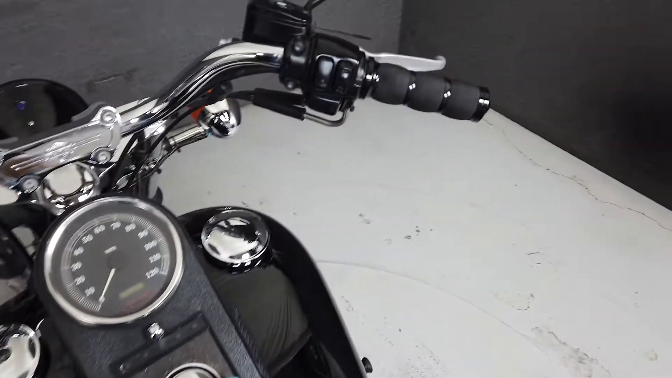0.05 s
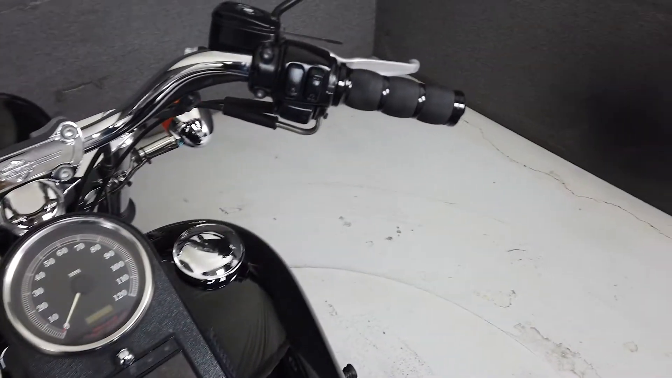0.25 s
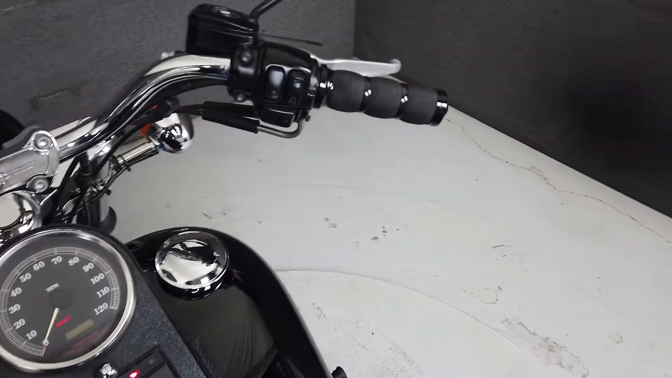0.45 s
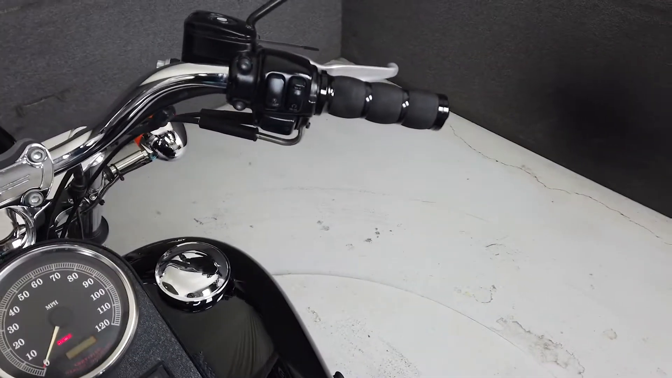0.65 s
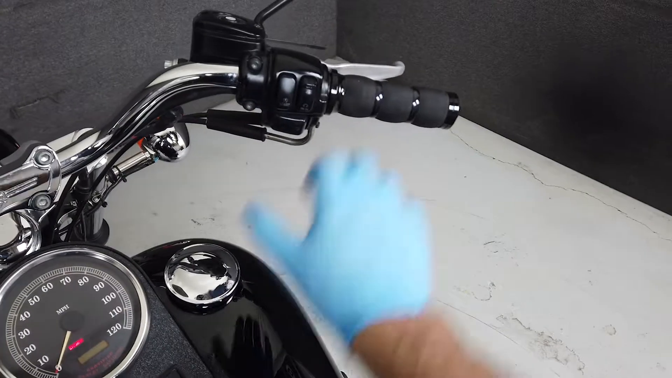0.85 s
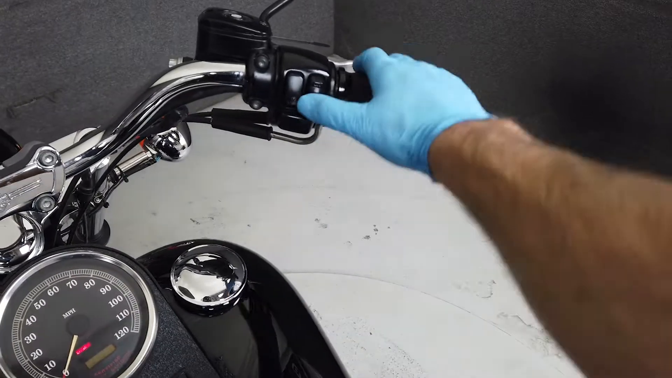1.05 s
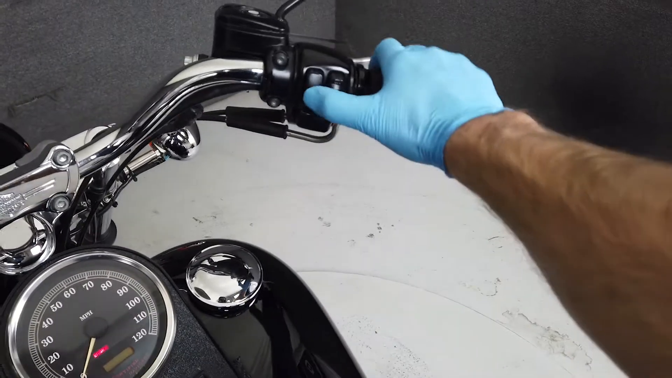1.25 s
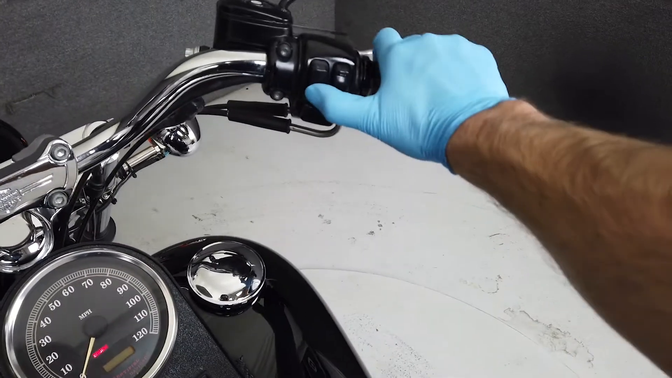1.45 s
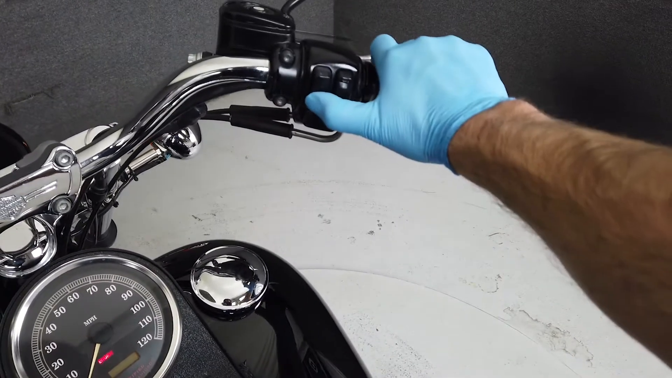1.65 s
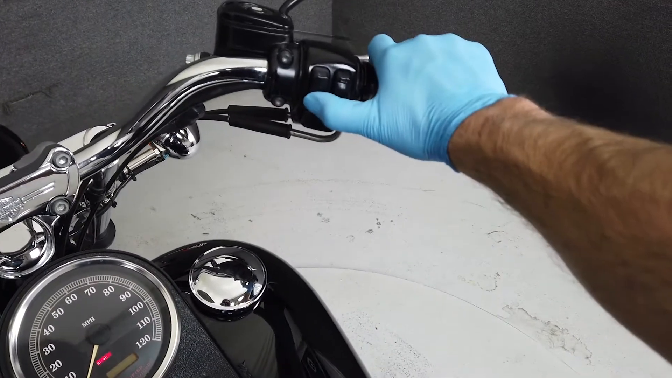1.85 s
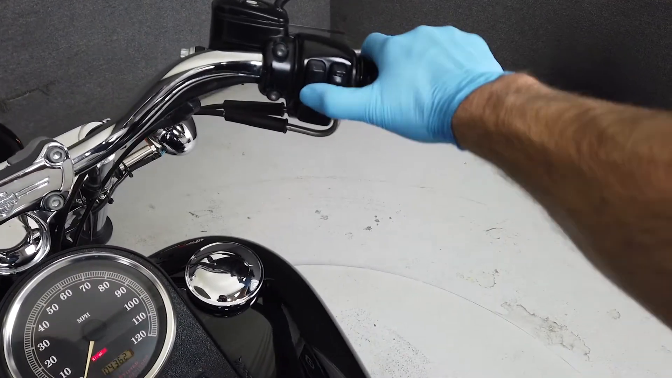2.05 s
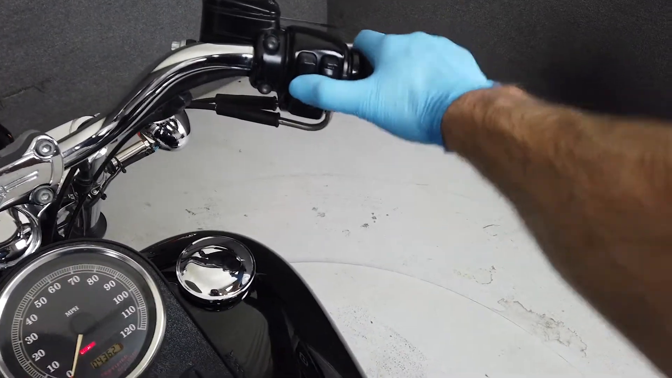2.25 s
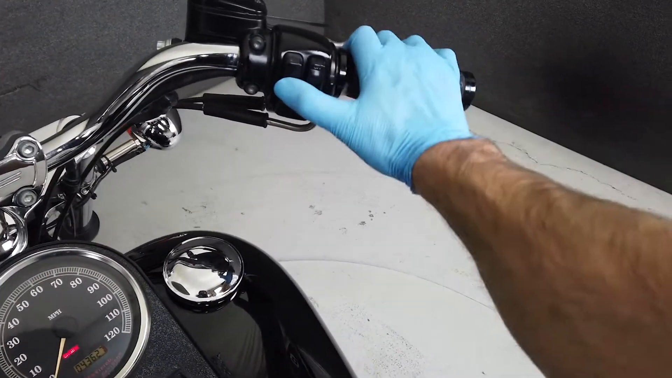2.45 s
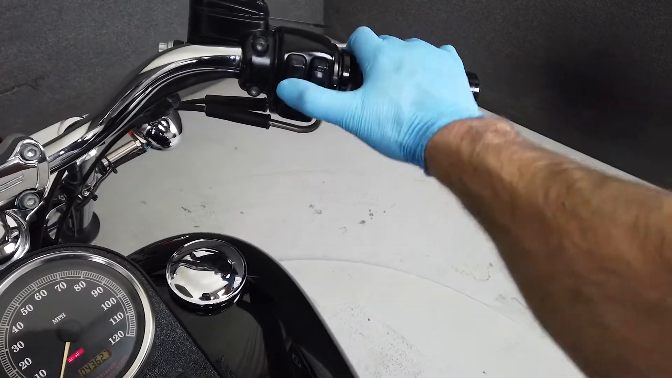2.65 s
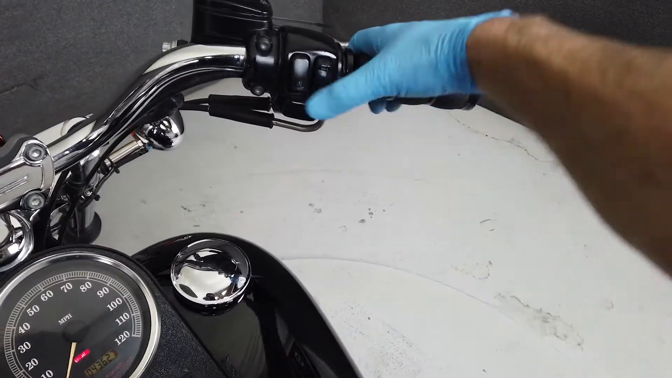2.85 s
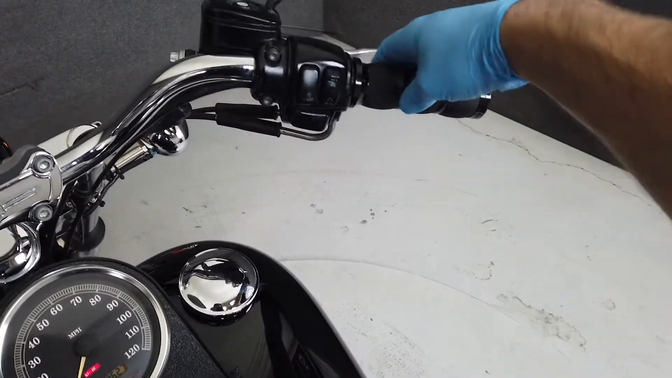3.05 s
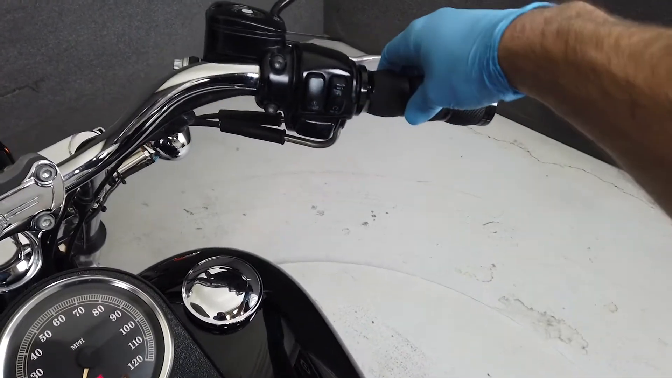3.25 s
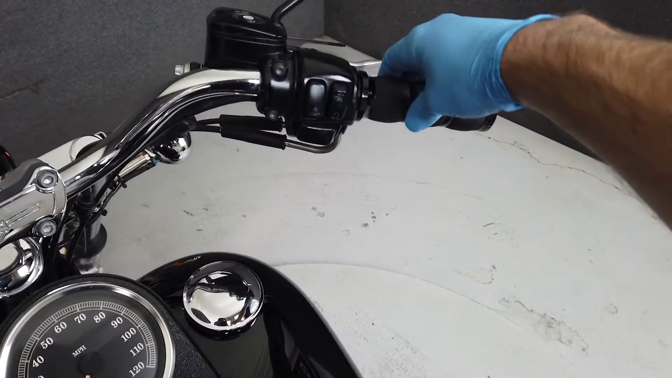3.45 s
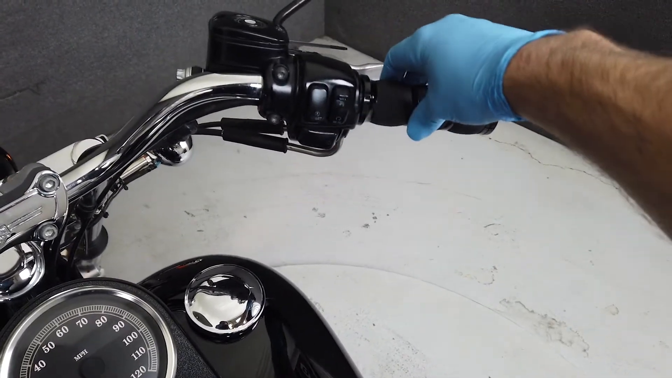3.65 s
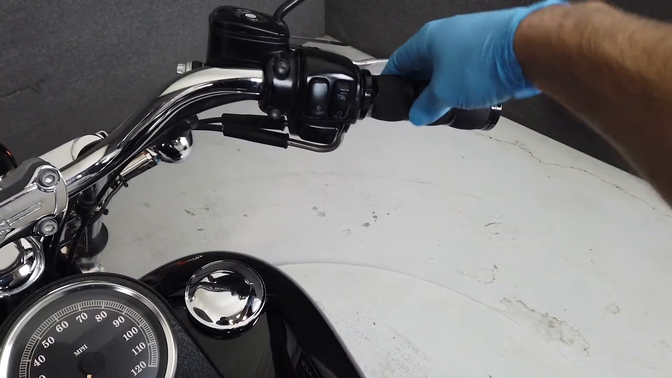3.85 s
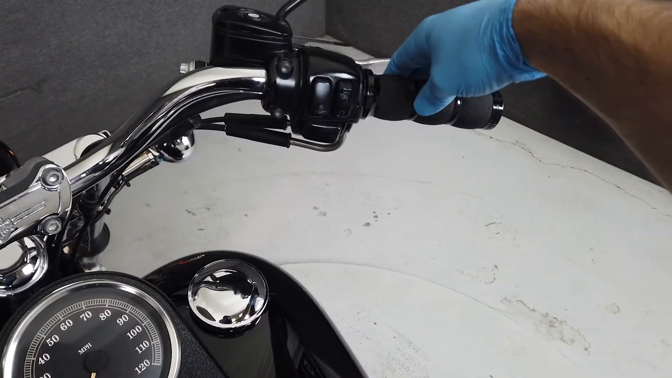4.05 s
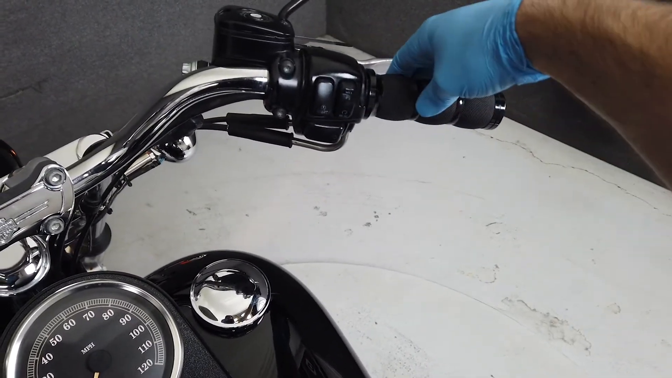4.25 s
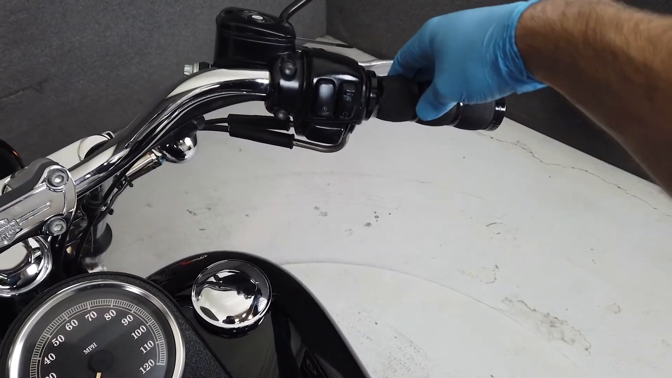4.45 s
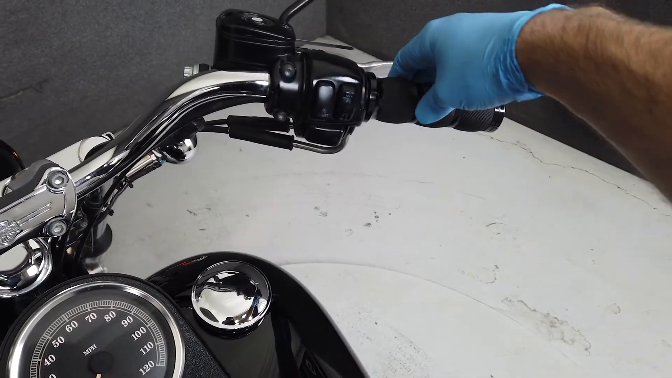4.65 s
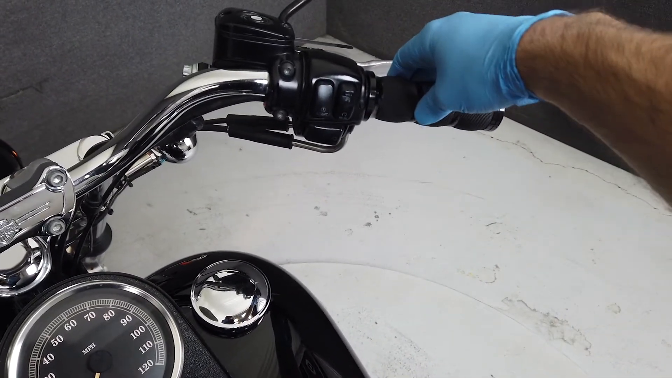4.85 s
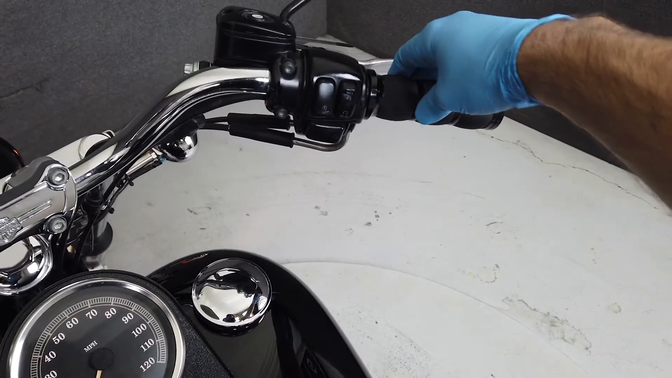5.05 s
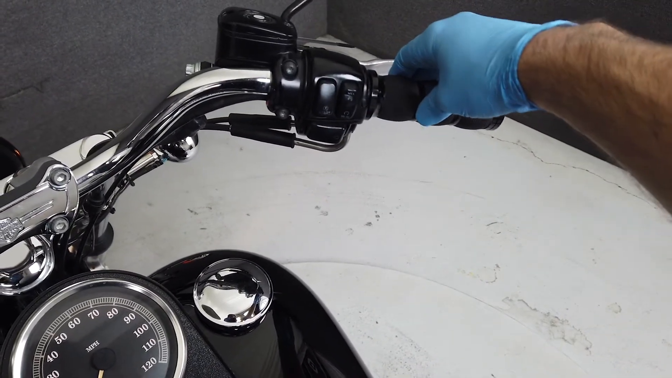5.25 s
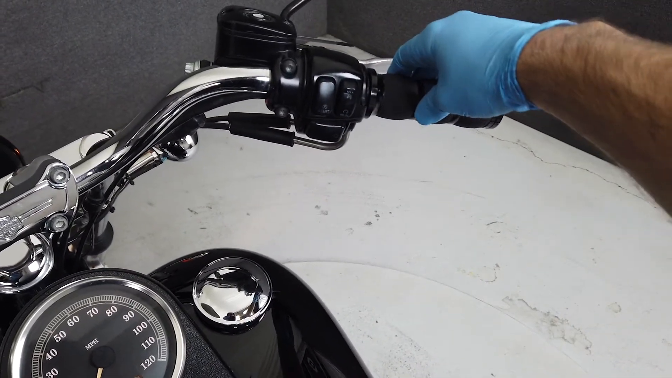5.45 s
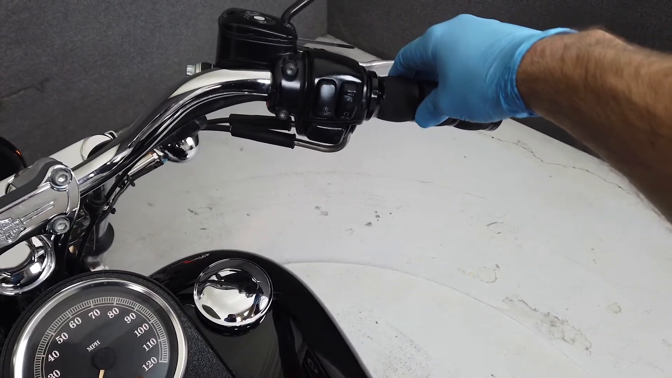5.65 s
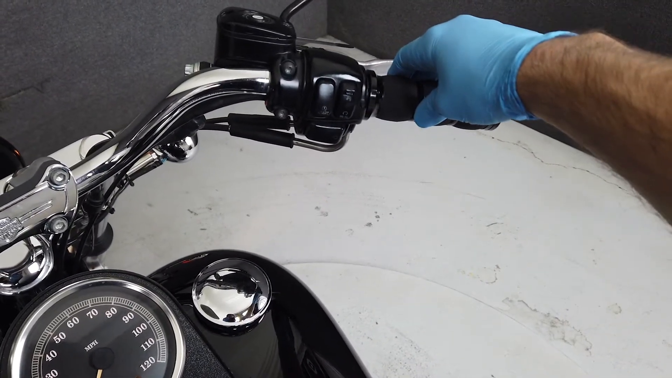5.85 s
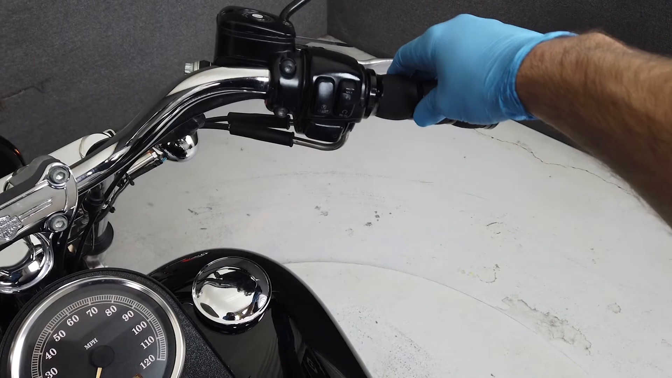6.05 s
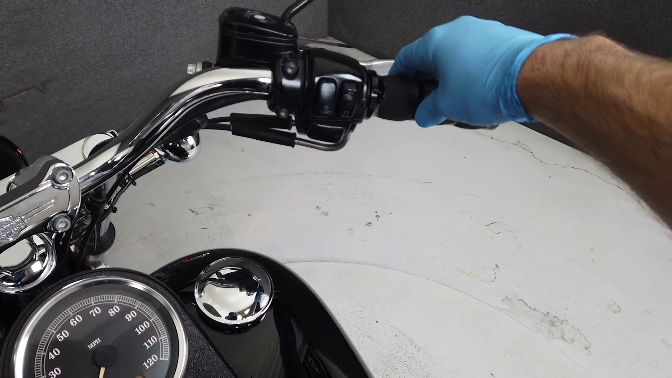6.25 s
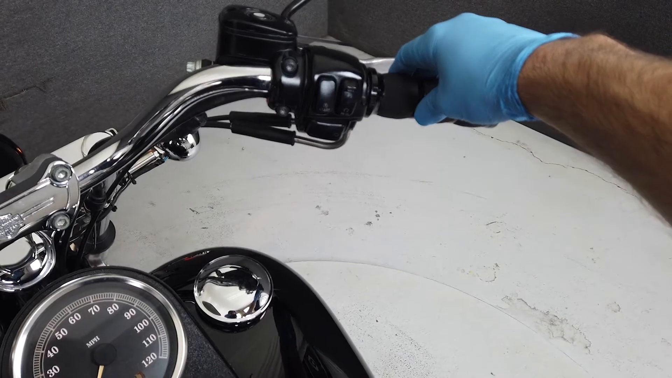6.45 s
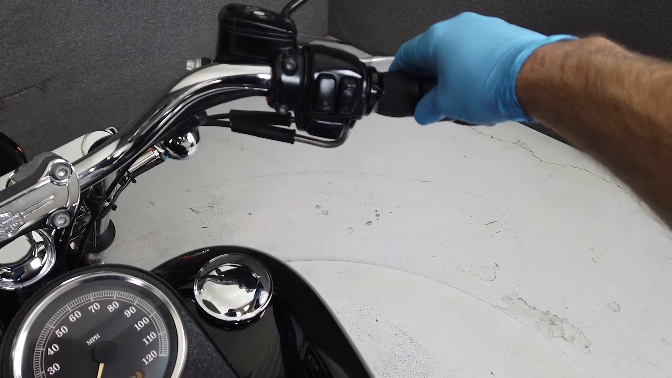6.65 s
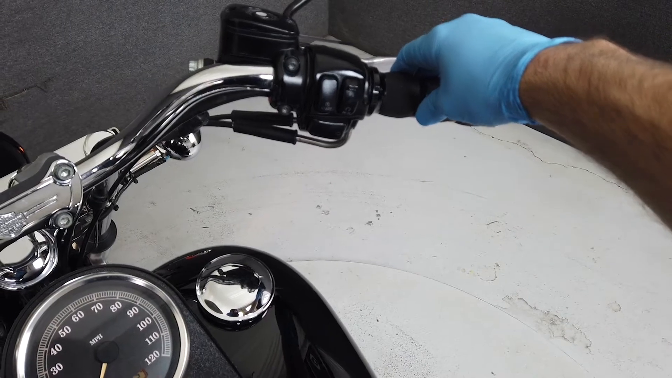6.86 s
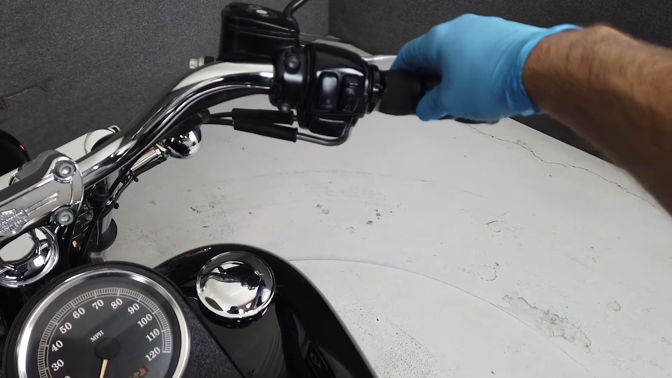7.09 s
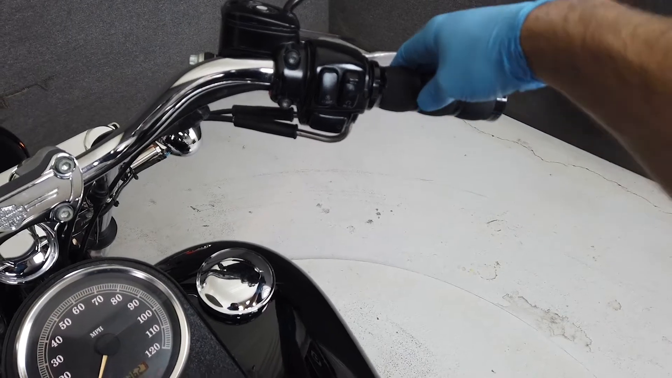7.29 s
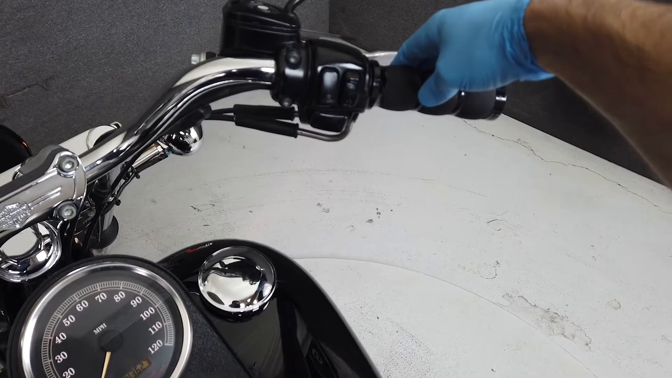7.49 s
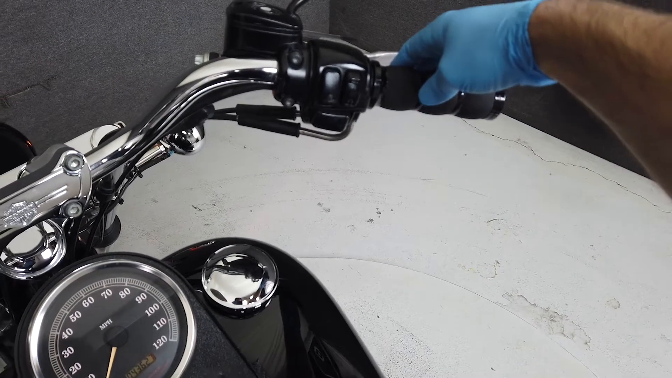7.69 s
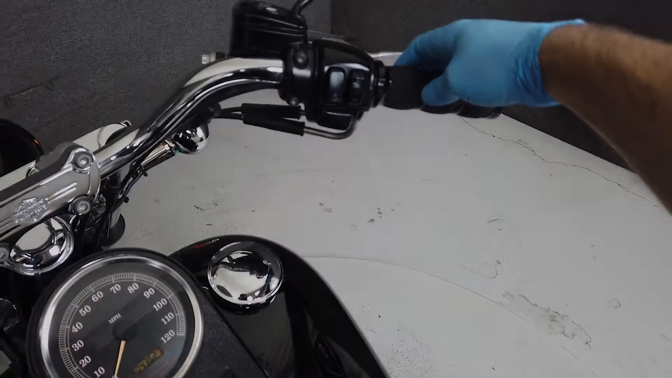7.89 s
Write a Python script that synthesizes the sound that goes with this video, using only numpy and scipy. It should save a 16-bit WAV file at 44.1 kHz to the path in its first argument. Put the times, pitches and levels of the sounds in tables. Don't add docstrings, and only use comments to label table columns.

```python
import sys
import numpy as np
from scipy import signal
from scipy.fft import rfft, irfft, next_fast_len
from scipy.io import wavfile
from scipy.ndimage import uniform_filter1d

SR = 44100
rng = np.random.default_rng(int(sys.argv[2]) if len(sys.argv) > 2 else 0)


def to_linear_factor(level_db):
    exponent = np.asarray(level_db, float) / 20
    return 10 ** exponent


def dump_mix(stems):
    frames = np.atleast_2d(stems).T
    limited = np.clip(frames, -1, 1)
    pcm = np.round(limited * 32767).astype(np.int16)
    wavfile.write(sys.argv[1], SR, pcm)


N = 349488


def in_time(rows, edge=None):
    s, *columns = np.transpose(rows)
    return [np.interp(np.arange(N) / SR, s, column, left=edge, right=edge) for column in columns]


def at_hz(points, hz):
    point_hz, value = np.array(points)[:, 0], np.array(points)[:, 1]
    return np.interp(np.log(hz + 1), np.log(point_hz), value)


def bump(s, width):
    return np.exp(-((np.arange(N) / SR - s) / width) ** 2)


def clicks(times, heights):
    train = np.full(N, 1e-18)
    places = (np.asarray(times) * SR).astype(int)
    np.add.at(train, np.clip(places, 0, N - 1), heights)
    return train


def fade(train, seconds):
    return signal.lfilter([1], [1, -np.exp(-1 / (seconds * SR))], train)


def ring(train, hz, t60):
    r, w = to_linear_factor(-60 / (t60 * SR)), 2 * np.pi * hz / SR
    return signal.lfilter([0, np.sin(w)], [1, -2 * r * np.cos(w), r * r], train)


def lumps(seconds):
    wander = fade(rng.standard_normal(N), seconds)
    return wander / wander.std()


def stereo(mid, side, alike):
    return np.sqrt(1 + alike) * mid + np.sqrt(1 - alike) * side * [[1], [-1]]


# frequency in Hz, likeness from 0 to 1.
EAR_LIKENESS = [(250, .99), (500, .96), (1000, .9), (2000, .58), (4000, .25), (8000, .3), (12000, .2)]


def noise(spectrum):
    size = next_fast_len(N)
    hz = np.fft.rfftfreq(size, 1 / SR)
    mid, side = rfft(rng.standard_normal((2, size)))
    both = stereo(mid, side, np.clip(at_hz(EAR_LIKENESS, hz), 0, 1))
    out = irfft(both * to_linear_factor(at_hz(spectrum, hz)), size)[:, :N]
    return out / out.std()


def room(x):
    t60_s = 0.33
    t = np.arange(int(.6 * SR)) / SR
    mid, side = rng.standard_normal((2, len(t))) * to_linear_factor(-60 * t / t60_s) * (t > .006)
    side = signal.sosfilt(signal.butter(2, 1500, "high", fs=SR, output="sos"), side)
    tails = (mid + side * [[1], [-1]]) / np.sqrt(np.sum(mid ** 2))
    tails = signal.sosfilt(signal.butter(1, 3500, fs=SR, output="sos"), tails)
    return signal.fftconvolve(np.atleast_2d(x), tails, axes=1)[:, :N]


# time in seconds, peak level in dB.
SNAP = [(0.59, -7)]
# frequency in Hz, level in dB per Hz.
SHOP_AIR = [(18, -36), (30, -10), (98, -10), (161, -1), (280, -9), (486, -7), (554, -12), (801, -13),
            (1320, -18), (1590, -16), (2540, -23), (6210, -40), (11700, -45), (16000, -57)]
# time in seconds, level in dB.
NUDGES = [(0.0, -39), (0.06, -39.5), (0.2, -48), (0.35, -49), (0.5, -51), (1.31, -51), (1.36, -46)]


def shop():
    rub = noise([(20, 0), (80, -8), (150, 10), (260, -8), (1000, -60)])
    nudge_s, nudge_db = np.transpose(NUDGES)
    nudges = uniform_filter1d(fade(clicks(nudge_s, to_linear_factor(nudge_db)), .1), size=600)
    duck_db = -5.5 * fade(clicks([SNAP[0][0]], 1), 1.1)
    return to_linear_factor(-46.5 + duck_db) * noise(SHOP_AIR) + nudges * rub


# frequency in Hz, level in dB per Hz.
HISS = [(2060, -3.5), (3500, -4.5), (5930, -13), (6450, -11.5), (9620, -11), (11400, -9), (15100, -21.5),
        (15900, -1.5), (16300, -58)]
# time in seconds, peak level in dB.
TICKS = [
    (.063, -30),
    (.076, -29),
    (1.437, -31),
    (1.455, -27),
]
# frequency in Hz, level in dB, time to fall 60 dB in seconds.
TICK_BODY = [(620, -4, .015), (950, -3, .015), (2200, -1, .01), (3400, -8, .006), (4300, -8, .006)]
# frequency in Hz, level in dB per Hz.
COVER = [(120, -44), (200, -10), (263, -12), (623, 6.5), (883, -20), (968, 3), (1320, -23), (1710, 2.5),
         (2250, -14.5), (11900, -48), (16000, -59)]
# seconds after the snap, level in dB.
RATTLE = [(0.015, -35), (0.021, -19), (0.026, -9), (0.037, -40), (.045, -36), (0.059, -38)]
# frequency in Hz, level in dB, time to fall 60 dB in seconds.
COVER_MODES = [(480, -6, 0.023), (645, 1, 0.022), (830, 6, 0.038), (1090, -10, 0.03), (1670, -24, .02)]


def switches():
    tick_s, tick_db = np.transpose(TICKS)
    soft = signal.sosfilt(signal.butter(2, 4000, fs=SR, output="sos"), clicks(tick_s, to_linear_factor(tick_db)))
    ticks = sum(to_linear_factor(db - 2) * ring(soft, hz, t60) for hz, db, t60 in TICK_BODY)
    (snap_s, snap_db), = SNAP
    after, after_db = np.transpose([(0.00056, 0)] + RATTLE)
    hits = clicks(snap_s + after, to_linear_factor(snap_db + after_db))
    panel = to_linear_factor(-22) * sum(to_linear_factor(db) * ring(hits, hz, t60) for hz, db, t60 in COVER_MODES)
    crack = to_linear_factor(-27.5) * fade(clicks([snap_s], to_linear_factor(snap_db)), 0.0063) * noise(HISS)
    rattle = to_linear_factor(-7.0) * uniform_filter1d(fade(hits, 0.003), size=40) * noise(COVER)
    return ticks + panel + rattle + crack


# frequency in Hz, level in dB per Hz.
TANK = [(300, -20), (480, -17), (900, 2.5), (1250, 1), (1700, -9), (2600, -19), (6000, -41)]


def afterglow():
    t = np.arange(N) / SR
    struck = fade(clicks([SNAP[0][0] + .012], 0.8), 0.044)
    drone = to_linear_factor(-27) * uniform_filter1d(struck, size=400) * noise(TANK)
    solenoid_s, rise_s = 1.437, .012
    scrape = to_linear_factor(-48) * np.exp(np.minimum(t - solenoid_s, 0) / rise_s) * (t < solenoid_s)
    return drone + scrape * noise(HISS)


def thunk():
    shudder = ring(rng.standard_normal(N), 108, 0.048)
    return to_linear_factor(-48) * fade(clicks([1.455], 0.92), 0.12) * shudder / shudder.std()


# time in seconds, thump level in dB, bark level in dB.
PUFFS = [(1.716, -25.5, -23), (1.745, -24.5, -34), (1.794, -24, -28.5), (1.928, -31.5, -60),
         (2.051, -34, -57), (2.222, -22.5, -27), (2.336, -33, -51), (2.488, -24, -28.5), (2.589, -24, -26)]
# multiple of the mesh rate, level in dB.
MESH = [(1, -2), (2, -5), (3, -2), (4, -2), (5, -7), (6, -8), (7, -13), (8, -15), (9, -19), (10, -20)]
# frequency in Hz, level in dB per Hz.
GRIND = [(120, -32.5), (200, -16), (232, -4.5), (317, -1), (551, 0.5), (726, -10), (1190, -5.5), (1490, 0),
         (5300, -11), (8000, -14.5), (10900, -9.5), (14900, -27), (16300, -51)]
ENGAGED = (1.438, 2.65)
# time in seconds, share of speed lost.
COMPRESSIONS = [(1.505, .33), (1.638, .24), (1.69, .06), (2.035, .17), (2.11, .05), (2.2, .33),
                (2.475, .27)]
# time in seconds, half length in seconds.
SLACK = [(1.881, 0.041), (2.299, 0.035)]
# time in seconds, change in dB, half length in seconds.
STRAINS = [(1.476, 10, 0.027), (1.54, 5, 0.048), (1.636, 9.5, 0.039), (1.97, 2.5, 0.017),
           (2.09, -5.5, 0.015), (2.173, 3.5, 0.013), (2.376, -1, 0.02), (2.443, 5.5, 0.012),
           (2.552, 3, 0.022)]


def starter():
    t = np.arange(N) / SR
    cold_hz, free_hz, spin_up_s = 385, 515, .06
    base_hz = free_hz + (cold_hz - free_hz) * np.exp(-np.maximum(t - PUFFS[0][0], 0) / spin_up_s)
    sag_s, recover_s = .05, .045
    sag = sum(lost * np.exp(-np.maximum((s - t) / sag_s, (t - s) / recover_s)) for s, lost in COMPRESSIONS)
    mesh_hz = uniform_filter1d(base_hz * (1 - sag), size=600) * (1 + .034 * lumps(.006))
    strain_db = sum(db * bump(s, half) for s, db, half in STRAINS)
    slack_db = -15.5 * sum(bump(s, half) for s, half in SLACK)
    engaged = uniform_filter1d(1. * (t > ENGAGED[0]) * (t < ENGAGED[1]), size=300)
    phase = 2 * np.pi * np.cumsum(mesh_hz) / SR
    whine = sum(to_linear_factor(db + 4.5 * lumps(.03)) * np.sin(k * phase) for k, db in MESH)
    whine *= to_linear_factor(-46.5 + strain_db + 0.55 * slack_db)
    grind = to_linear_factor(-42.5 + 0.78 * strain_db + slack_db) * noise(GRIND)
    return engaged * (whine + grind)


# time in seconds, frequency in Hz, level in dB.
KNOCKS = [(1.461, 1040, -34.5), (1.602, 1230, -36), (1.6, 2770, -39.5), (1.709, 2820, -40),
          (1.71, 2070, -49), (1.721, 3690, -38), (2.16, 1570, -43), (2.15, 3240, -45.5), (2.222, 3330, -45),
          (2.435, 1610, -42), (2.436, 3180, -45), (2.545, 1620, -43), (2.58, 2720, -38), (2.59, 1090, -39),
          (2.649, 2420, -31.5), (2.691, 3600, -39), (2.691, 4420, -44), (2.738, 2870, -35.5),
          (2.737, 3420, -41), (2.803, 2780, -36), (2.829, 2880, -48), (2.86, 2900, -49), (3.433, 2060, -44),
          (3.497, 2570, -49), (3.656, 2660, -47), (3.816, 2700, -35), (3.968, 2750, -40),
          (4.053, 2840, -36.5), (4.952, 2940, -48), (5.008, 2850, -40), (5.047, 2370, -42),
          (5.101, 2940, -45), (5.184, 2180, -53), (5.222, 3140, -45), (5.271, 1530, -56),
          (5.356, 1560, -43), (5.442, 2830, -52), (5.527, 1410, -33.5), (5.564, 2520, -40),
          (5.605, 2610, -36), (5.638, 2900, -48), (5.683, 2800, -46), (5.789, 3030, -44),
          (5.871, 2330, -54), (5.949, 2840, -42), (6.068, 2850, -39), (6.143, 2550, -40),
          (6.247, 2970, -48), (6.365, 2600, -39), (6.432, 2500, -36.5), (6.501, 2810, -31),
          (6.631, 2700, -35), (6.662, 2790, -33.5), (6.785, 2930, -36), (6.876, 2910, -31.5),
          (6.933, 2690, -34), (7.011, 3070, -40), (7.381, 2680, -45)]
# time in
# seconds, frequency in Hz, level in dB.
TAPS = [(2.737, 790, -26.5), (3.654, 1300, -44), (4.332, 1100, -57), (4.44, 1080, -45), (4.643, 1130, -50),
        (4.697, 1980, -47.5), (4.698, 2740, -49.5), (4.855, 1280, -41), (4.853, 2600, -46),
        (4.911, 2050, -44), (4.954, 1970, -44), (5.048, 1110, -45), (5.222, 2200, -46), (5.358, 3330, -51),
        (5.372, 1620, -47), (5.441, 850, -40), (5.482, 1370, -44), (5.575, 1860, -40), (5.682, 1580, -36),
        (5.79, 1420, -46), (5.872, 2200, -44), (6.068, 855, -34), (6.142, 880, -37), (6.25, 1504, -35),
        (6.362, 1520, -35), (7.298, 487, -28), (7.345, 460, -30), (7.37, 394, -29), (7.53, 2680, -49),
        (7.66, 1510, -49), (7.75, 2100, -49.5)]


def knocks(rows):
    out, t = np.zeros((2, N)), np.arange(int(.1 * SR)) / SR
    for s, hz, db in rows:
        mid, side = rng.standard_normal((2, len(t)))
        shake = stereo(mid, side, .75) * np.exp(-t / 0.019)
        rung = ring(shake, hz, 0.021)
        start = int(s * SR)
        out[:, start:start + len(t)] += to_linear_factor(db) * rung / rung[:, :len(t) // 4].std()
    return out


# time in seconds, four-stroke cycles per second.
SPEED = [(2.652, 9.82), (2.86, 18.17), (3.12, 13.55), (3.38, 8.54), (3.7, 14.22), (3.84, 18.62),
         (3.97, 22.79), (4.23, 17.87), (4.46, 12.84), (4.72, 8.73), (5.02, 10.95), (5.7, 12.78),
         (6.35, 13.7), (6.97, 18.41), (7.32, 23.34), (7.62, 16.7), (7.92, 12.51)]


def cycles_turned():
    return np.cumsum(in_time(SPEED, edge=0)[0]) / SR


# time in seconds, gas flow as bark level in dB, rear pulse against front in dB.
THROTTLE = [(2.64, -29, -4), (2.74, -28.5, -29), (2.88, -30.5, 5), (2.94, -35, 2), (3.4, -44.5, -7),
            (3.46, -39, 0), (3.94, -26, -8), (4.06, -30, -26), (4.6, -42.5, -17), (4.84, -38, -18),
            (5.02, -38, 8.5), (5.55, -31, -7), (5.8, -35, 7.5), (6.05, -32.5, -2.5), (7.16, -25.5, -1),
            (7.34, -31, 0), (7.48, -30.5, -5), (7.92, -44.5, -11)]


def follow(law):
    speed = in_time(SPEED)[0]
    speed_up = uniform_filter1d(np.gradient(speed) * SR, size=3000)
    base, per_flow, per_speed, per_speed_up = law
    flow_db = in_time(THROTTLE)[0] + 28
    return base + per_flow * flow_db + per_speed * (speed - 15) + per_speed_up * speed_up


def multiple(cycle, k):
    return -np.cos(2 * np.pi * k * cycle - .12 * (k - 5) ** 2)


STROKE = [2, 4, 5, 6, 7, 9, 11, 12, 14, 16]
STROKE_DB = [-12.5, -13, -2, 0.5, -16.5, 0.5, -6, -2.5, -8, -17]
STROKE_SHUT_DB = [12.5, 10, 3.5, -7.5, -6, -0.5, -6.5, -1.5, -4, -12]
# multiple, level in dB.
PASSING = [(7, 2), (8, -29), (10, -5.5), (11, -6.5), (13, -16), (14, -6.5), (15, -3), (17, 1), (18, -4)]
# frequency in Hz, half width in Hz, level in dB.
PASS_PIPE = [(110, 54, -3.5), (233, 22, -7.5), (304, 12, -4)]
# value at mean flow and speed, then change per dB of flow, per cycle/s, per cycle/s^2 of speed-up.
# Level of the pumping tones, in dB.
PUMP_LAW = (-29.5, 0.75, 0.37, 0.0)
HEAVE_LAW = (-33.5, 0.7, 0.7, 0.0163)
HOWL_LAW = (-48, 0.25, 0.2, 0.036)
SHUT_LAW = (0, 0, 0, -.07)


def pumping():
    cycle, speed, shut = cycles_turned(), in_time(SPEED)[0], follow(SHUT_LAW).clip(0, 1)
    tones = np.zeros(N)
    for k, db, shut_db in zip(STROKE, STROKE_DB, STROKE_SHUT_DB):
        tones += to_linear_factor(db + shut_db * shut + 2.5 * lumps(.06)) * multiple(cycle, k)
    for k, db in PASSING:
        tuned = sum(to_linear_factor(pipe_db) / (1 + ((k * speed - hz) / width) ** 2) for hz, width, pipe_db in PASS_PIPE)
        tones += to_linear_factor(db - 3.0 * shut) * tuned * multiple(cycle, k)
    heave = to_linear_factor(-8) * np.sin(6 * np.pi * cycle) + np.sin(8 * np.pi * cycle)
    heave *= to_linear_factor(2.5 * lumps(.03))
    howl = ring(rng.standard_normal(N), 525, .045)
    howl *= to_linear_factor(follow(HOWL_LAW)) / howl.std()
    return (to_linear_factor(follow(PUMP_LAW)) * tones + to_linear_factor(follow(HEAVE_LAW)) * heave + howl) * (cycle > 0)


PATCH_HZ = [1500, 5500, 8000, 10000, 12500, 17000]


def patchy(x):
    out = x
    for edges in zip(PATCH_HZ, PATCH_HZ[1:]):
        band = signal.butter(1, edges, "band", fs=SR, output="sos")
        out = out + (to_linear_factor(1.3 * lumps(.012)) - 1) * signal.sosfilt(band, x)
    return out


# time in seconds, thump change in dB, bark change in dB.
MISFIRES = [(2.652, -2, 0), (2.74, 4, 3.5), (2.771, -22, -3.5), (3.285, 4.5, 2), (3.325, 3, -3.5),
            (3.389, -10, -12), (3.495, 2, 5.5), (3.66, 2, -2), (3.969, -28, 3), (4.01, -19, -6),
            (4.395, 3, -3), (4.553, 6, -10), (4.601, 1, -6), (4.646, 6, -3), (4.701, 1.5, -1.5),
            (4.743, -13, -13), (4.807, -4.5, -14), (4.855, 8, -6.5), (4.914, 0, -5), (4.959, 0, -4.5),
            (5.011, 4, 4.5), (5.049, -0.5, 3.5), (5.101, 4, 4), (5.187, 5, 1), (5.225, 3, 0.5),
            (5.273, 8.5, 3), (5.31, -20, -36), (5.359, 5.5, -2.5), (5.396, -27, -48), (5.447, 4.5, -4),
            (5.483, -8, -3), (5.531, 3, 1.5), (5.568, 10.5, 5), (5.609, 1.5, 4), (5.684, 2, 2),
            (5.719, -6, -42), (5.759, -22, -19), (5.796, -9, 2.5), (5.839, 2, 3), (5.877, 0.5, 7),
            (5.92, 9, 8), (6.026, -33, -65), (6.071, 1, -1.5), (6.103, -3, -45), (6.145, -8, -2.5),
            (6.219, -1, 6), (6.251, 8, 1), (6.292, 1.5, 6.5), (6.324, -5, -41), (6.364, 0, -1),
            (6.504, 4, 2), (6.571, 0, -0.5), (6.601, 1, -6.5), (6.664, -3, 6), (6.696, 2, -3.5),
            (7.359, 11, -10), (7.526, -22, 0), (7.844, -12, -3.5)]
# time in seconds, level in dB.
SHUTS = [
    (2.88, 14.5),
    (3.99, 11),
    (7.32, 13.5),
]
PULSE_LAW = (-21, 0.63, -0.75, -0.0955)
RING_LAW = (-32.5, -0.5, 0.95, 0.25)
HISS_LAW = (-37.5, 1.1, -0.08, 0.06)
BURST_LAW = (0.51, 0.014, -0.031, 0.00037)


def firings():
    turned = cycles_turned()
    rear = np.tile([0, 1], int(turned[-1]) + 1)
    angle = np.arange(len(rear)) // 2 + 315 / 720 * rear + 1e-6
    rear, angle = rear[angle < turned[-1]], angle[angle < turned[-1]]
    at = np.searchsorted(turned, angle)
    times = at / SR
    bark_db, rear_db = [curve[at] for curve in in_time(THROTTLE)]
    front_db, hiss_db = follow(PULSE_LAW)[at], follow(HISS_LAW)[at]
    share = follow(BURST_LAW)[at].clip(0, 1)
    sing_db = sum(db * bump(s, 0.025) for s, db in SHUTS)
    pipe_db = (follow(RING_LAW) + sing_db)[at] - front_db - .5 * rear_db * rear
    luck = rng.standard_normal((len(times), 2))
    thump_db = front_db + rear_db * rear + luck[:, 0]
    merged_db = -1.0 * np.maximum(in_time(SPEED)[0][at] - 15, 0)
    thump_db, pipe_db = thump_db + merged_db, pipe_db - .5 * merged_db
    burst_db = 10 * np.log10(np.gradient(times) / .04)
    burst_db += 2.0 * luck[:, 1].clip(-1.3, 1.3) + 2.0 * rear + 2.3
    stall_db = np.zeros(N)
    for when, thump_change_db, bark_change_db in MISFIRES:
        weak = np.argmin(abs(times - when))
        times[weak] = when
        thump_db[weak] += thump_change_db
        burst_db[weak] += bark_change_db
        burst_db[weak + 1] -= 0.16 * bark_change_db
        gap = slice(at[weak] - 600, at[weak + 1] - 300)
        stall_db[gap] = 0.46 * min(bark_change_db, 0) * np.linspace(0, 1, gap.stop - gap.start) ** 0.12
    stall = to_linear_factor(uniform_filter1d(stall_db, size=100))
    barks, hisses = to_linear_factor(burst_db + bark_db) * share, to_linear_factor(burst_db + hiss_db) * share
    return times, rear, thump_db, pipe_db, barks, hisses, stall


def pull(times, heights, hz):
    u = (np.pi * hz * np.arange(-900, 901) / SR) ** 2
    return signal.oaconvolve(clicks(times, heights), (2 * u - 1) * np.exp(-u), "same")


# frequency in Hz, width in Hz, level in dB.
PIPE = [(238.7, 7.3, -4), (292.7, 13, -7.5), (378, 10.4, -11), (488, 10.6, -12.5), (526, 18, -13),
        (605.6, 9.4, -11.5)]
# delay in seconds, share of a front pulse, share of a rear pulse.
ECHOES = [(0.012, 0.62, 0.42), (0.0185, 0.45, 0.13), (0.0225, 0.26, 0.4), (0.028, 0.25, 0.17),
          (.0335, .05, .2), (0.043, 0.043, 0.067)]
PULSE_HZ = [114, 106]


def exhaust_thump(times, rear, thump_db, pipe_db):
    cranked = slice(len(PUFFS))
    out = pull(times[cranked], to_linear_factor(thump_db[cranked] - 10), 44.5)
    out += to_linear_factor(-46) * ring(out, 77.2, 0.39)
    for side, hz in enumerate(PULSE_HZ):
        wave = pull(times[rear == side], to_linear_factor(thump_db[rear == side]), hz)
        out += wave
        for delay, *shares in ECHOES:
            lag = int(delay * SR)
            out[lag:] += shares[side] * wave[:-lag]
    out += to_linear_factor(-53) * ring(out, 114, .07)
    kicks = clicks(times - .006, to_linear_factor(thump_db + pipe_db))
    pipe = sum(to_linear_factor(db) * ring(kicks, hz, np.log(1000) / np.pi / width) for hz, width, db in PIPE)
    steep = signal.butter(4, 212, "high", fs=SR, output="sos")
    return out + signal.sosfilt(steep, pipe)


# frequency in Hz, level in dB, time to fall 60 dB in seconds.
CASE = [(760, -4, 0.04), (1202, 0.5, 0.04), (1533, -1, 0.025), (2080, 1, 0.03), (2400, 2, 0.025),
        (2820, 8, 0.014), (3360, -4, .015)]


def case_clatter(times, barks):
    hits = np.tanh(2 * rng.standard_normal((len(times), 2 * len(CASE))))
    rattle = rng.standard_normal(N)
    out = np.zeros(N)
    for k, (hz, db, t60) in enumerate(CASE):
        late_s = 0.0033 * abs(hits[:, -k - 1])
        shakes = fade(clicks(times + late_s, barks * to_linear_factor(db - 27.5) * hits[:, k]), 0.013)
        out += ring(rattle * shakes, hz, t60)
    return out


# frequency in Hz, level in dB per Hz.
BARK = [(180, -5.5), (300, 4), (344, -6), (385, -4), (517, 0.5), (694, -7), (751, -6), (1020, -10),
        (1520, -8), (1740, -14), (2890, -17.5), (3470, -26), (4500, -34), (5850, -39.5), (9900, -120)]


def engine():
    times, rear, thump_db, pipe_db, barks, hisses, stall = firings()
    puff_s, puff_db, puff_bark_db = np.transpose(PUFFS)
    times, barks = np.r_[puff_s, times], np.r_[to_linear_factor(puff_bark_db), barks]
    hisses = np.r_[to_linear_factor(puff_bark_db - 11), hisses]
    rear, pipe_db = np.r_[1 + 0 * puff_s, rear], np.r_[-12.0 + 0 * puff_s, pipe_db]
    thump = exhaust_thump(times, rear, np.r_[puff_db, thump_db], pipe_db)
    bark_db, hiss_db = in_time(THROTTLE)[0], follow(HISS_LAW)
    rush = np.clip(1 - follow(BURST_LAW), 0, 1) * stall * (np.arange(N) > 2.64 * SR)
    lull_s = .012
    lull = signal.oaconvolve(clicks(times - .0055 - lull_s / 2, 1), np.hanning(int(lull_s * SR)), "same")
    rush = rush * (1 - .6 * lull.clip(0, 1))
    swell = 1 - np.exp(-1 / (.0008 * SR))
    bark = signal.lfilter([swell], [1, swell - 1], fade(clicks(times - .0045, barks), .022))
    hiss = fade(clicks(times - .004, hisses), 0.046)
    flow = (bark + rush * to_linear_factor(bark_db)) * noise(BARK)
    flow = flow + (hiss + rush * to_linear_factor(hiss_db)) * patchy(noise(HISS))
    turbulence = to_linear_factor(0.58 * lumps(0.045)) * flow
    return thump + stall ** 0.16 * pumping(), turbulence + case_clatter(times, barks)


def scene():
    thump, turbulence = engine()
    small = signal.sosfilt(signal.butter(4, 230, "high", fs=SR, output="sos"), switches())
    turbulence = turbulence + knocks(KNOCKS)
    wet = to_linear_factor(-18) * thump + to_linear_factor(-7.0) * turbulence.mean(axis=0) + to_linear_factor(-5) * small.mean(axis=0)
    wall = to_linear_factor(-36) * np.roll(thump, int(0.0151 * SR)) * [[1], [-1]]
    background = shop() + small + afterglow() + thunk() + starter()
    return background + thump + wall + turbulence + knocks(TAPS) + room(wet)


def roll_off(x):
    return signal.sosfilt(signal.butter(12, 16480, fs=SR, output="sos"), x)


def record(dry):
    top = signal.cheby2(12, 70, 16300, fs=SR, output="sos")
    mix = signal.sosfilt(top, 1.366 * np.tanh(dry / 0.66))
    return roll_off(mix)


dry = scene()
out = record(dry)
dump_mix(out)
```